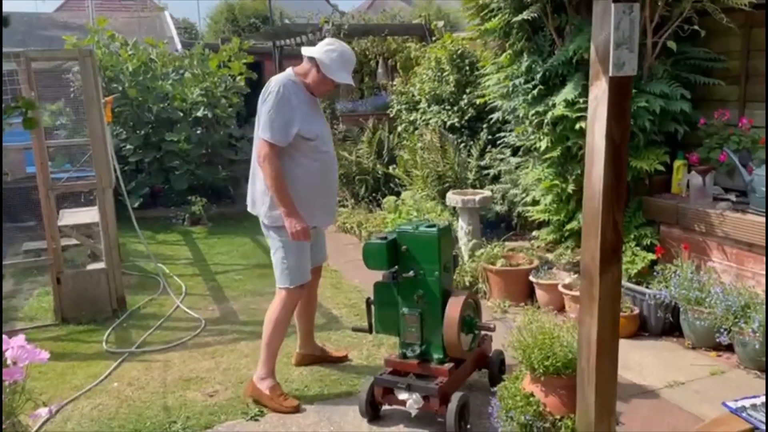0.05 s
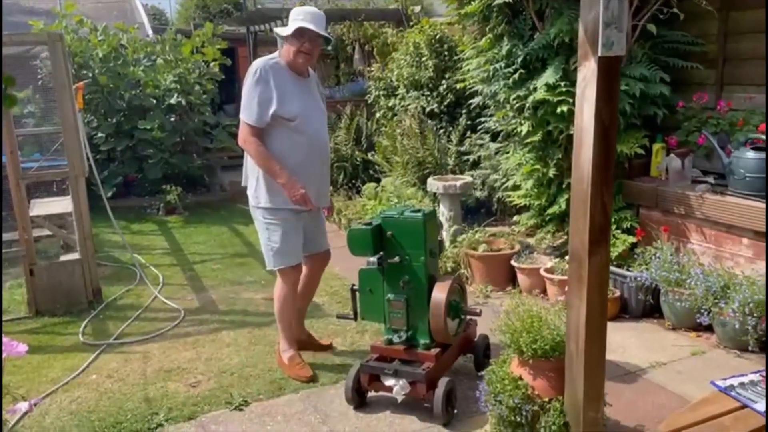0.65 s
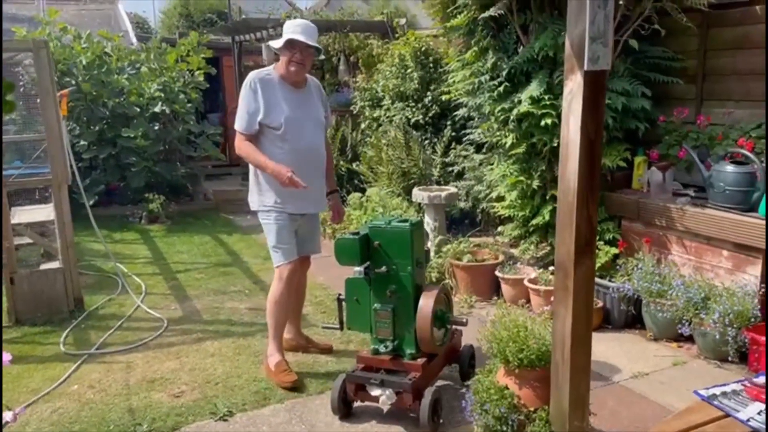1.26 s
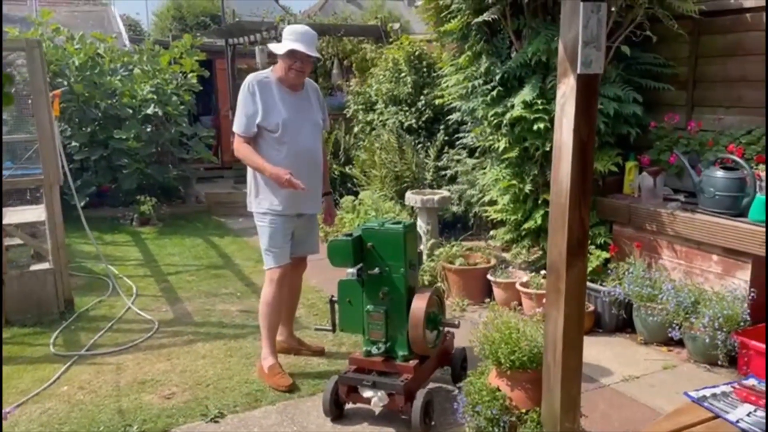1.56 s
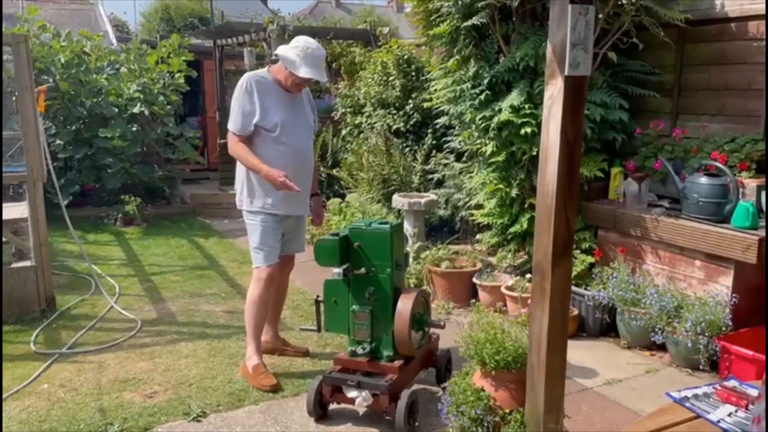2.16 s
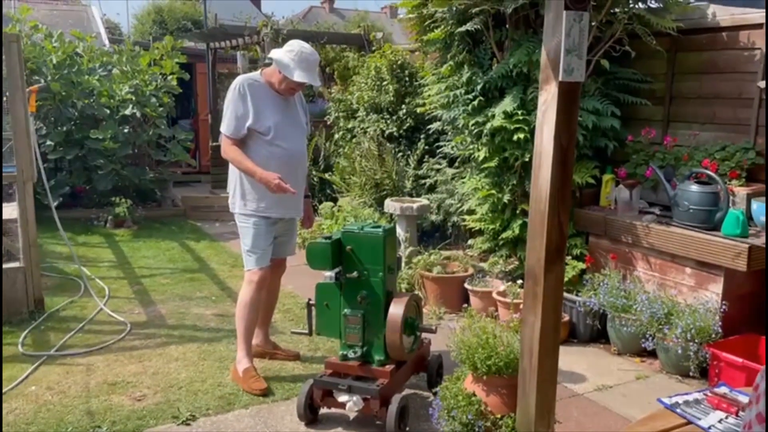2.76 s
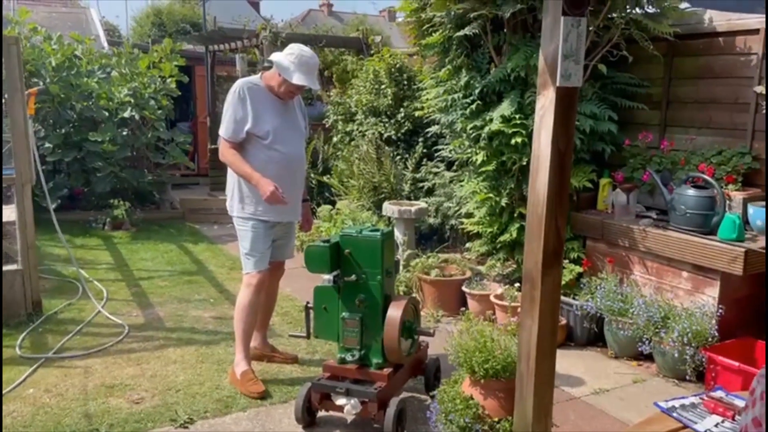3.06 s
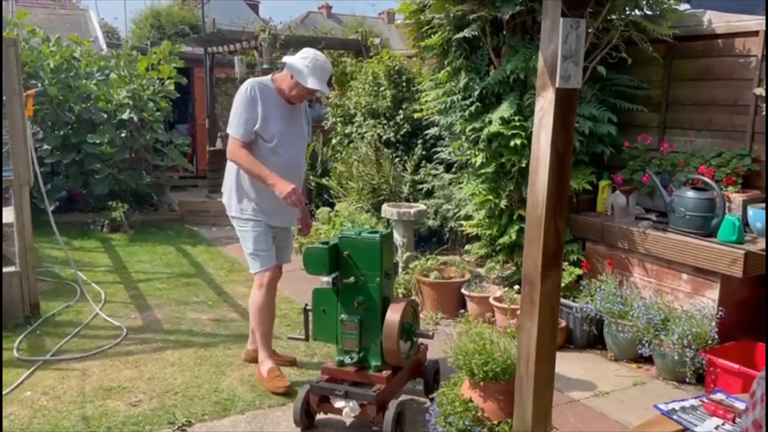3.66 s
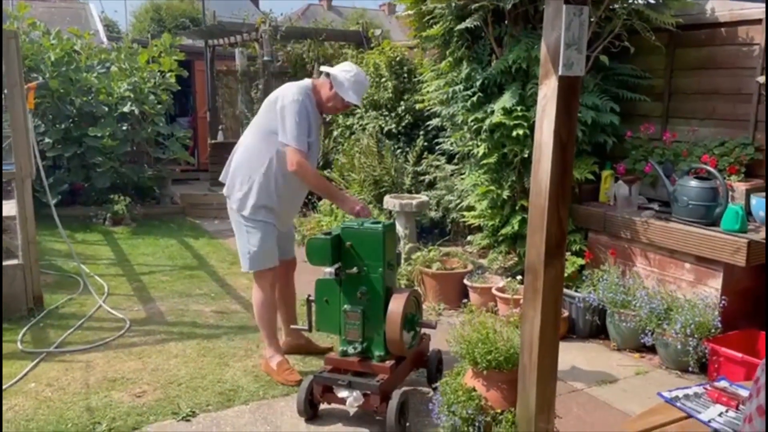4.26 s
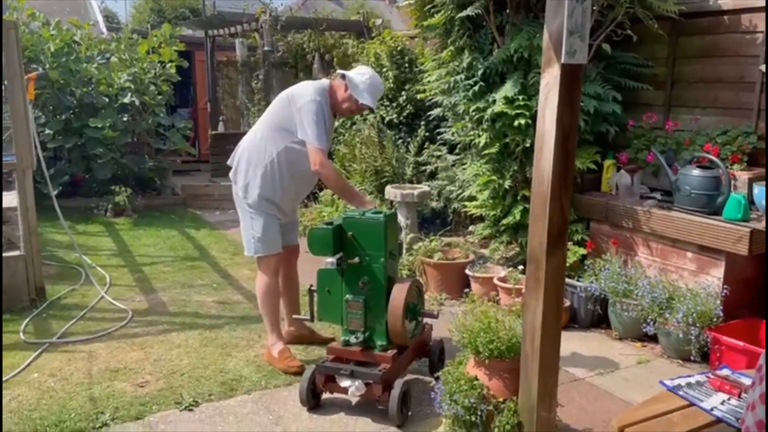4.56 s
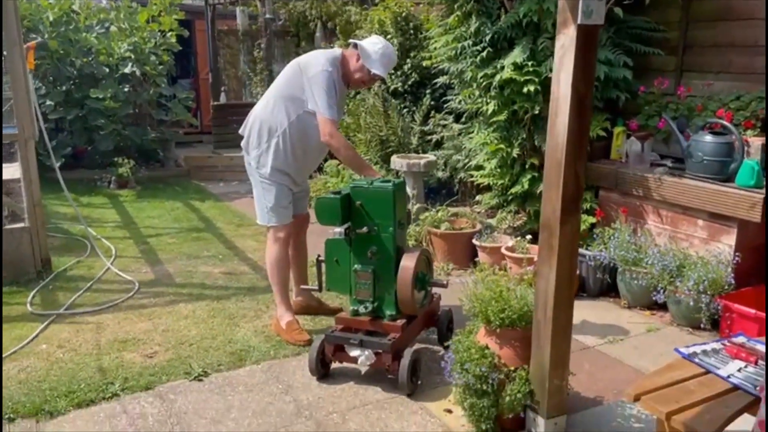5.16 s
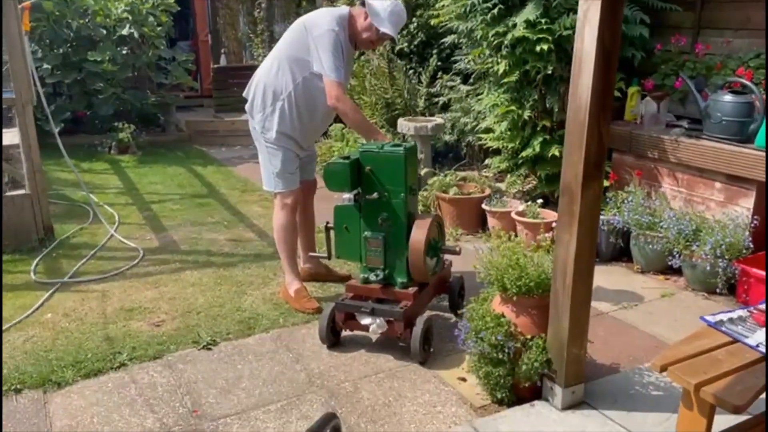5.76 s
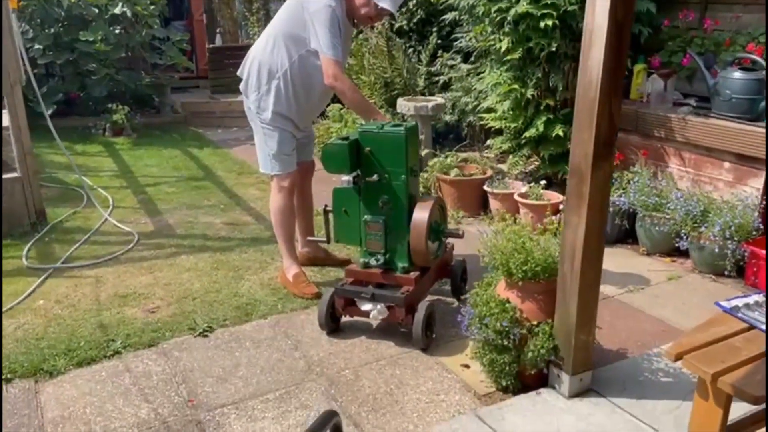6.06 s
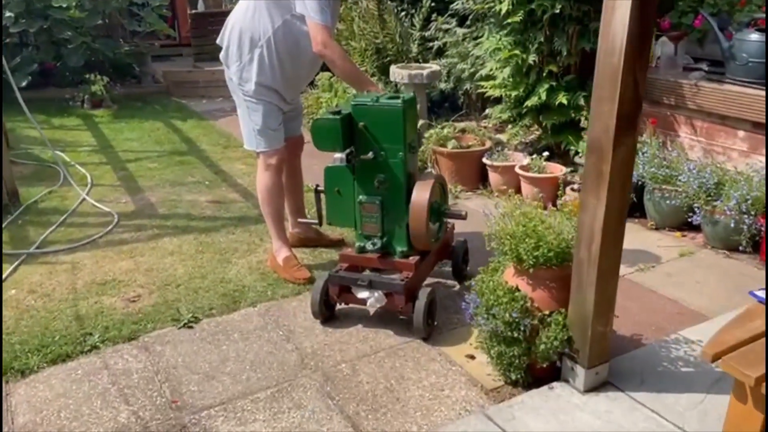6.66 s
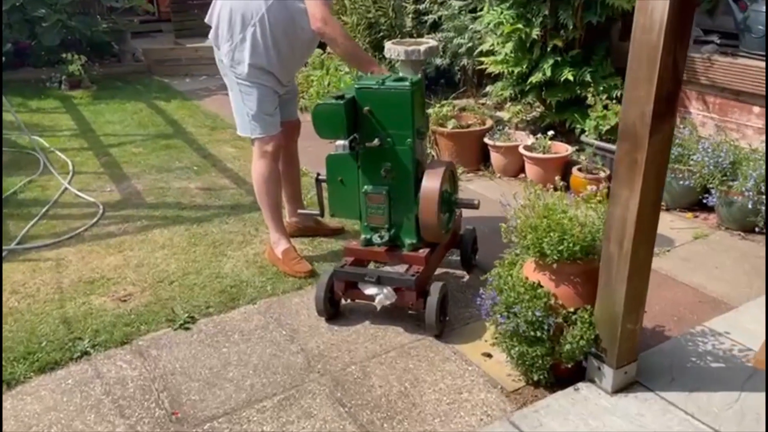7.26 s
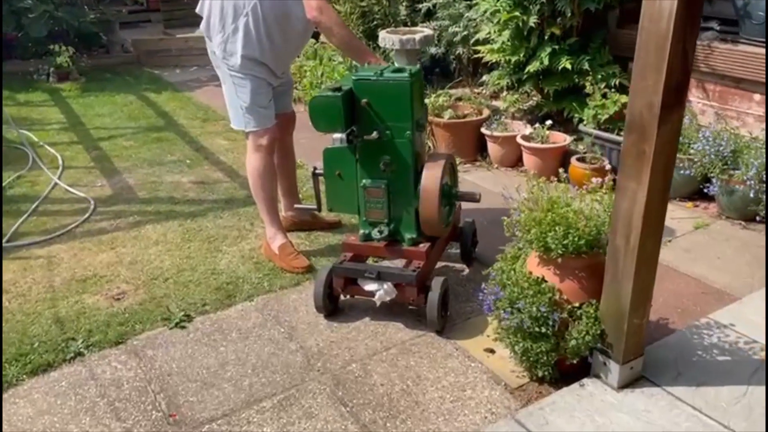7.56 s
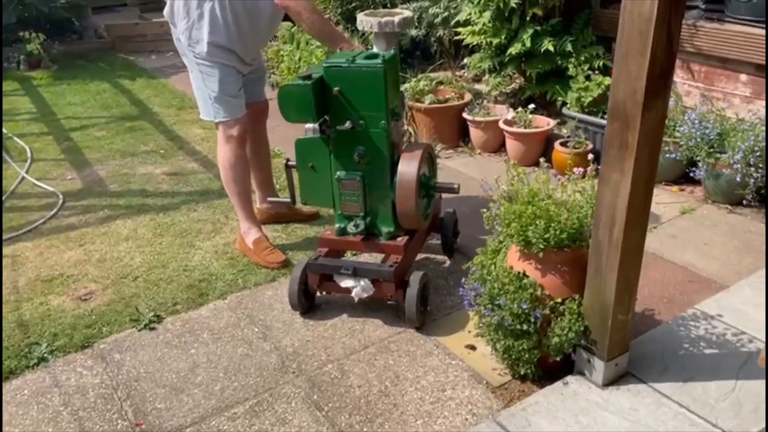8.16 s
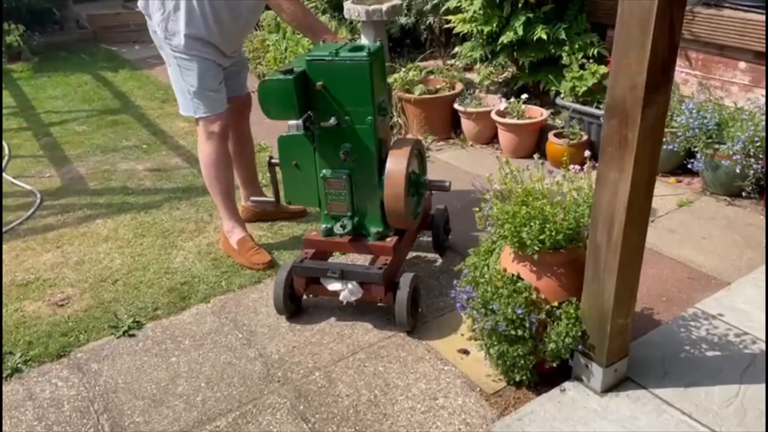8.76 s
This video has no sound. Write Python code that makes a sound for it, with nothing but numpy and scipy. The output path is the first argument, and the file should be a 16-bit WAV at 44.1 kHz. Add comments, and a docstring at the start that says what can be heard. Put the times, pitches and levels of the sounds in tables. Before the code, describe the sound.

A single-cylinder petrol engine idles in a small garden, about six beats a second. Only some beats fire, each with a bark, a deep thump and a brief whistling hiss; the rest cough softly. Valves clack and gears rattle throughout, with a slight echo from a wall. The microphone starts well back and moves closer in the last third, where the thud grows fuller.

```python
"""Stationary engine in a small garden

A single-cylinder petrol engine idles on its trolley, six cycles a second. Only some cycles fire: those
bark, hiss and thump from the exhaust; the others cough softly. Valve gear clacks and gears rattle
throughout, and a garden wall throws everything back. The microphone starts well back, then comes
slowly lower and closer."""
import sys
import numpy as np
from scipy import signal
from scipy.fft import rfft, irfft, next_fast_len
from scipy.io import wavfile
from scipy.ndimage import uniform_filter1d

SR = 44100
rng = np.random.default_rng(int(sys.argv[2]) if len(sys.argv) > 2 else 0)


def to_wav(s):
    """Save 16-bit WAV."""
    ch = np.atleast_2d(s).T  # columns
    pcm = np.round(np.clip(ch, -1, 1) * 32767)  # PCM
    wavfile.write(sys.argv[1], SR, pcm.astype(np.int16))


N = 392931
TIME = np.arange(N) / SR
EVENT_TIME = TIME[:SR // 3]

# the microphone's walk up to the engine: time_s, nearness (0 far, 1 close)
MIC_PATH = [(0, 0.28), (1.7, 0.1), (4.8, 0.093), (6.2, 0.19), (6.85, 0.72), (8.9, 0.82)]
# cycles that coast: start_s, puff_db, tick_db, clack_db, cough_db
COASTING_CYCLES = [(-0.004, 1, -1.5, 2.5, 0.5), (0.157, 1, -3, 1, -1), (0.479, 0.5, 1.5, 3.5, -0.5),
                   (0.642, 2, 4.2, -1.5, 1), (0.808, -1, 3.5, 5.5, -6), (1.133, 0.5, -1.5, 2, -1),
                   (1.459, 4.5, -2.8, 3, 0.6), (1.945, 1.3, -1.5, 1, -0.7), (2.111, -2, -0.6, -1.5, -1),
                   (2.429, 6, -2.5, 1, 0), (2.59, 1, 0, 0.5, 0.4), (2.752, 1.0, 1.5, 2.5, 0),
                   (3.073, 6.5, 2, 2.8, -3), (3.234, 3.5, -2, 0.5, -1.7), (3.887, 0.5, -0.5, 3, 0),
                   (4.053, 3.5, -2.5, 1, -2.5), (4.371, -0.5, -0.5, 3, -0.5), (4.528, 1, -1, 3, -1),
                   (4.689, 2, -1, 2, -1), (5.009, 4, -1.5, 5, 0), (5.174, 4.5, 2.5, -3, -0.5),
                   (5.495, 0, 0.5, 1, -0.5), (5.656, 2.5, -3, 0, 0.5), (5.98, -4, 1.0, 3, 0.3),
                   (6.144, -0.7, 0, 2.5, -1), (6.462, -1, 1, 2.8, -0.1), (6.621, -3, -2.5, -1, 1.5),
                   (7.106, -5, -10, 0.2, 1.5), (7.594, -5, -1.5, 0, 0.5), (7.752, -1, -4.5, 0.5, 2),
                   (8.074, -2, -2.9, -0.4, 1), (8.231, -4, -3.5, -2, 0.4), (8.556, -2.1, -1, 1.5, 0),
                   (8.876, 1, 2, 5, 1)]
# cycles that fire: start_s, charge_db, pop_db, port_ring_hz, port_ring_db,
# whistle_hz, whistle_db, second_whistle_hz, second_whistle_db
FIRING_CYCLES = [(0.322, 0.5, -6, 700, -6, 4000, 0, 4540, 0),
                 (0.968, -1.0, -1.8, 670, 5, 4440, -4, 4900.0, -9),
                 (1.296, -0.5, 1.0, 684, -4, 4480, 4.5, 5090.0, -2),
                 (1.621, -1, 1.3, 930, -8, 4480.0, -2, 4230.0, -1),
                 (1.781, -2, -5, 835, 5, 4550, -5, 5000, -14),
                 (2.275, 0, 1.5, 664, 1.5, 4650, 1.5, 4860, 3),
                 (2.916, -0.9, 0, 830, -10, 4640, 0, 4240, 0),
                 (3.399, -0.3, 2, 843, 8, 4670, -2.0, 4230.0, -4),
                 (3.561, -0.6, 0.5, 842, 6, 4220.0, -7, 4470.0, 2.5),
                 (3.726, -0.6, -1.5, 679, 6, 5120.0, 1, 4480.0, 0),
                 (4.217, -0.5, -1, 821, 8, 4360, 4, 4490, 1.5),
                 (4.852, -1.5, -1, 823, 9, 4760, -3, 4480, 0),
                 (5.337, -0.5, -3.5, 946, 6, 4240, -3, 4400, 2),
                 (5.819, -0.7, -5, 863, 7.5, 4360, 2, 3940.0, -2.0),
                 (6.308, 0.5, -6, 488, 4, 4570, 1, 4090, -5),
                 (6.78, -3.0, 2, 696, -1, 4640, -3, 4190.0, -13),
                 (6.943, -1.5, 3, 800, 0, 4410, -5, 4830, 1), (7.267, 0, 0, 823, 6, 4290, 2, 4130, -5),
                 (7.43, -1.5, -4, 834, 9.5, 4250, -6, 5120, -5.8),
                 (7.912, 0, 1, 860, -3, 4940, -1.5, 3930.0, -3),
                 (8.394, 0.3, 2, 750, -6, 4410, -2.4, 4920, -4),
                 (8.716, 0.3, 2, 960.0, 5, 4200, 2, 3910.0, -3)]

# resonances set off by a push: pitch_hz, level_db, delay_s, rise_s, t60_s
POP_MODES = [(150, -8, 0.00033, 0.0011, 0.029), (443, -1.5, 0.00048, 0.0031, 0.013),
             (604, 5.5, 0.00055, 0.0018, 0.027), (830, -6, 0.00098, 0.0014, 0.17)]  # the port as the exhaust opens
COUGH_MODES = [(55, -23.5, 0.03417, 0.0048, 0.16), (89.5, -22, 0.0215, 0.0099, 0.12),
               (131, -35.5, 0.0231, 0.0046, 0.055), (158.6, -35.5, 0.0207, 0.029, 0.54)]  # the exhaust on a coasting cycle
HEAD_MODES = [(327, -8, 0.0009, 0.0018, 0.034), (540, 2.5, 0.00042, 0.0018, 0.025),
              (1360, -8, 0.00214, 0.0008, 0.025)]  # the cylinder head as the valve seats
BOOM_MODES = [(56.7, 11.5, 0.0065, 0.027, 0.17), (109.3, 4.5, 0.02374, 0.0034, 0.11),
              (133.5, 11, 0.02659, 0.0043, 0.078), (148, -15, 0.0177, 0.026, 0.13)]  # exhaust and silencer after a firing
THUD_MODES = [(111.7, 7, 0.001, 0.012, 0.035), (89.7, 15, 0.0241, 0.016, 0.073)]  # the first surge of gas and the thud that follows
# resonances of the exhaust port: pitch_hz, width_hz, peak_db
PORT_MODES = [(236, 65, 4.5), (418, 80, -1.5), (703, 57, 0), (783, 45, 3.5), (1054, 39, 3.5)]
# resonances of the iron casting: pitch_hz, width_hz, peak_db, ring_db
CASTING_MODES = [(294, 87, 7.5, -11), (444, 9.4, 11, -11.5), (522.6, 30, 2, -8.5), (685, 48, 8.5, 0),
                 (816, 14, 7.5, 0), (990.5, 60, 9, 1), (1138, 15, -10, -5), (1348, 27, 6, -9),
                 (1660, 13, 4, -5.5), (1977, 50, 0, -9), (2335, 40, 1, -8), (2766, 37, 3.5, -17)]
# small steel parts of the rocker: pitch_hz, ring_db
ROCKER_MODES = [(2330, 2), (2900, 2), (4480, -2), (4730, 0.5), (5080, -2), (6430, -11.5)]
# ticks of cam, push rod and rocker in each cycle: delay_s, level_db, scatter_s
LINKAGE_TICKS = [(-.002, -9, 0.00042), (0.027, -10.5, 0.0028), (.036, -17, 0.0033), (.079, -9, 0.0055),
                 (0.094, -9.5, .003), (.132, -13.5, 0.0011)]

# colours of the noises: frequency_hz, level_db
PUFF_COLOUR = [(30, -33), (100, 1.5), (300, -17.5), (560, -1), (800, 0.5), (1200, -16), (2500, -23),
               (4600, -22), (7000, -62), (12000, -38)]  # air through the port
GEAR_COLOUR = [(30, -17), (100, 3), (230, -14.5), (420, 0.5), (700, -3), (1000, -5.5), (1400, -4),
               (2100, -11.5), (3400, -17), (4500, -15), (6400, -20), (7600, -53.5), (10500, -27),
               (12500, -36.5)]  # rattling teeth
CLACK_COLOUR = [(150, -23), (380, -15), (560, 15.5), (750, 11), (1000, 15.5), (1300, -9), (1800, 8.5),
                (2400, 10.5), (3400, -7.5), (4600, 4), (5600, 0), (7200, -63), (10500, -50), (12500, -63)]  # valve gear
TICK_COLOUR = [(1200, 6.5), (2000, -0.5), (2500, 3), (3400, -5), (4100, -0.5), (4600, 8), (5200, -16.5),
               (6300, -24), (7500, -57), (10000, -16), (12500, -33)]  # steel on steel
BARK_COLOUR = [(30, -14.5), (100, 5), (200, -3), (310, -3), (560, -2.5), (780, -2), (1200, -7.5),
               (2000, -19.5), (3300, -16.5), (4600, -9.5), (7000, -42), (12000, -43)]  # the charge going off
HISS_COLOUR = [(300, 0.5), (1000, -12), (2000, -6), (3400, -11), (4500, -0.5), (5400, -7.5), (6500, -6),
               (7500, -33), (8700, -34), (9700, -28), (11000, -13), (12500, -45)]  # escaping gas
SPIT_COLOUR = [(1500, -15), (4000, -4), (6000, -1), (7500, -34), (8100, -25), (8450, 4), (9000, 17.5),
               (9700, -2), (11000, 4), (12500, -27)]  # the exhaust's high spit
AIR_COLOUR = [(20, -53), (50, -8), (100, 1.5), (200, -6.5), (1000, -16), (4000, -24), (12000, -110)]  # garden air
# stereo width: frequency_hz, side_gain_db; the side is raised steeply around 7 to 9 kHz
STEREO_WIDTH = [(60, -36), (110, -9.5), (200, -8.5), (350, -8), (640, -4), (1160, -2.5), (2100, -5.5),
                (3800, -7.5), (5500, -12.5), (7000, 19), (8800, 11.5), (10000, -10.5), (12400, -10)]

# base levels at the microphone: far_db, close_db
COAST_POP_DB, PUFF_DB, COUGH_DB = (-35.5, -44), (-36.5, -34.5), (0, -4.5)
GEARS_DB, VALVE_DB, WALL_DB = (-39, -37), (-38, -36.5), (-11, -16.5)
FIRING_POP_DB, BOOM_DB, THUD_DB = (-26, -35.5), (-30.5, -32.5), (-34.5, -27.5)
BARK_DB, HISS_DB, WHISTLE_DB = (-29, -31.5), (-39, -40), (-39, -37.5)

WALL_DELAY_S = (0.054, 0.057)  # far, close
VALVE_SHUT_S = 0.045  # after the start of a cycle
BOOM_FOLLOWS, HISS_FOLLOWS = 0.26, 2  # dB per dB of charge
RING_DAMPING = 0.18  # ring time falls with this power of the frequency


def undb(db):
    """Decibels to gain."""
    return 10 ** (np.asarray(db) / 20)


def noise(size):
    """Unrelated mid and side noise."""
    return rng.standard_normal((2, size))


def at_mic(far_close, s):
    """A level or delay at time s, between its far and close values as the microphone moves."""
    nearness = np.interp(s, *np.transpose(MIC_PATH))
    return np.interp(nearness, [0, 1], far_close)


def cycles():
    """Every cycle in order, fired or not: start_s, tick_db, clack_db."""
    fired = [(s, 0, 0) for s, *_ in FIRING_CYCLES]
    coasted = [(s, tick_db, clack_db) for s, _, tick_db, clack_db, _ in COASTING_CYCLES]
    return np.transpose(sorted(fired + coasted))


def swell(rise_s, t60_s):
    """Envelope that opens smoothly and then dies away."""
    opening = np.sin(np.pi / 2 * np.minimum(EVENT_TIME / rise_s, 1)) ** 2
    return opening * np.exp(-np.log(1000) * np.maximum(EVENT_TIME - rise_s, 0) / t60_s)


def add(out, s, sound):
    """Mix a sound in at time s."""
    start = int(s * SR)
    a, b = max(start, 0), min(start + sound.shape[-1], N)
    if b > a:
        out[..., a:b] += sound[..., a - start:b - start]


def tint(x, colour, modes=()):
    """Filter by a broad colour with resonances that ring on; white noise keeps its power."""
    size = 2 * next_fast_len(N // 2 + 1, True)
    f = np.maximum(np.fft.rfftfreq(size, 1 / SR), 1)
    hz, db = np.transpose(colour)
    peaks_db = sum(peak / (1 + (2 * (f - centre) / width) ** 2) for centre, width, peak, *_ in modes)
    gain = undb(np.interp(np.log(f), np.log(hz), db) + peaks_db)
    cepstrum = irfft(np.log(gain / np.sqrt(np.mean(gain ** 2))), size)
    minimum_phase = np.exp(rfft(np.r_[cepstrum[0], 2 * cepstrum[1:size // 2]], size))
    return irfft(rfft(x, size) * minimum_phase, size)[..., :N]


def bursts(times, levels_db, envelope, colour, alike, modes=()):
    """Noise bursts: the share `alike` repeats, drifting with the microphone's place; the rest is new."""
    out = np.zeros((2, N))
    places = [noise(len(EVENT_TIME)) for _ in range(3)]
    for s, db in zip(times, levels_db):
        weights = np.cos(np.pi / 2 * np.minimum(abs(2 * s / TIME[-1] - np.arange(3)), 1))
        repeated = np.sqrt(alike) * sum(w * place for w, place in zip(weights, places))
        fresh = np.sqrt(1 - alike) * noise(len(EVENT_TIME))
        add(out, s, undb(db) * envelope * (repeated + fresh))
    return tint(out, colour, modes)


def resonate(times, levels_db, modes):
    """Each push sets a pipe or body swinging at its resonances."""
    out = np.zeros(N)
    for hz, db, delay, rise, t60 in modes:
        ring = swell(rise, t60) * np.sin(2 * np.pi * hz * EVENT_TIME)
        for s, push_db in zip(times, levels_db):
            add(out, s + delay, undb(db + push_db) * ring)
    return out


def puffs():
    """Without a firing the piston only pushes a soft, dull puff of air through the port."""
    s, puff_db = np.transpose(COASTING_CYCLES)[:2]
    envelope = swell(0.0016, 0.041) + undb(-4) * swell(0.02, 0.18)
    db = at_mic(PUFF_DB, s) + puff_db
    return bursts(s - 0.001, db, envelope, PUFF_COLOUR, alike=1, modes=PORT_MODES)


def pops():
    """The exhaust opens with a short hollow pop, harder after a firing."""
    fire_s, _, pop_db = np.transpose(FIRING_CYCLES)[:3]
    coast_s, puff_db = np.transpose(COASTING_CYCLES)[:2]
    mid = resonate(fire_s, at_mic(FIRING_POP_DB, fire_s) + pop_db, POP_MODES)
    mid += resonate(coast_s, at_mic(COAST_POP_DB, coast_s) + puff_db, POP_MODES)
    return np.array([mid, 0.8 * np.roll(mid, int(0.00015 * SR))])


def ticks(times, levels_db, envelope):
    """Dry little ticks of steel on steel."""
    force = np.zeros(N)
    for s, db in zip(times, levels_db):
        add(force, s, undb(db) * envelope)
    return tint(noise(N) * force, TICK_COLOUR)


def linkage(scatter_db=5.5):
    """Cam, push rod and rocker take up their slack at about the same points of every turn."""
    starts = cycles()[0][:, None]
    delay_s, tick_db, scatter_s = np.transpose(LINKAGE_TICKS)
    slip, force = rng.standard_normal((len(starts), 2, len(LINKAGE_TICKS))).transpose(1, 0, 2)
    s = starts + delay_s + scatter_s * slip
    db = at_mic(VALVE_DB, s) + tick_db + scatter_db * force + 2.5
    return ticks(s.ravel(), db.ravel(), swell(0.00099, 0.044))


def gears(knocks_per_s=200):
    """Timing gears and loose parts: tiny uneven knocks, loudest while the cam loads the teeth."""
    knocks = (rng.random(N) < knocks_per_s / SR) * undb(2.4 * rng.exponential(size=N))
    grain = signal.fftconvolve(np.minimum(knocks, 3), swell(0.0006, 0.027))[:N]
    rattle = tint(noise(N) * (grain + 3), GEAR_COLOUR, CASTING_MODES)
    shut_s = cycles()[0] + VALVE_SHUT_S
    turns = np.interp(TIME, shut_s, np.arange(len(shut_s)))
    # the cam turns once a cycle, the crank twice
    load_db = 1.4 * np.cos(2 * np.pi * (turns - 0.1)) + 0.98 * np.cos(4 * np.pi * (turns - 0.27))
    return rattle / rattle.std() * undb(at_mic(GEARS_DB, TIME) + load_db)


def coughs_and_thumps(mouth_hz=30):
    """Slugs of gas ring the exhaust's low resonances: a soft cough coasting, a deep thump on firing."""
    coast_s, *_, cough_db = np.transpose(COASTING_CYCLES)
    fire_s, charge_db = np.transpose(FIRING_CYCLES)[:2]
    cough = resonate(coast_s, at_mic(COUGH_DB, coast_s) + cough_db, COUGH_MODES)
    boom = resonate(fire_s, at_mic(BOOM_DB, fire_s) + BOOM_FOLLOWS * charge_db, BOOM_MODES)
    thud = resonate(fire_s, at_mic(THUD_DB, fire_s), THUD_MODES)
    # the small mouth of the pipe radiates little of the deepest bass
    mouth = signal.butter(3, mouth_hz, "high", fs=SR, output="sos")
    mid = signal.sosfiltfilt(mouth, cough + boom + thud)
    # a slightly later copy as the side signal pulls the sound to the left
    return np.array([mid, 0.77 * np.roll(mid, int(0.001 * SR))])


def metal_ring(times, levels_db, modes, t60_s, spread):
    """Metal rings after a blow; the high modes, of loose parts, die sooner and shift more each time."""
    out = np.zeros((2, N))
    hz, *_, ring_db = np.transpose(modes)
    envelopes = np.array([swell(0.00051, t60_s * (hz.min() / f) ** RING_DAMPING) for f in hz])
    for s, db in zip(times, levels_db):
        shifted_hz = hz * (1 + spread * np.sqrt(hz / hz.max()) * rng.standard_normal(len(hz)))
        tones = np.sin(2 * np.pi * (shifted_hz[:, None] * EVENT_TIME + rng.random((len(hz), 1))))
        strengths = noise(len(hz)) * undb(db + ring_db)
        add(out, s, strengths @ (tones * envelopes))
    return out


def valve():
    """The follower scrapes down the cam, the valve ticks onto its seat, the head knocks, iron rings."""
    start_s, tick_db, clack_db = cycles()
    s = start_s + VALVE_SHUT_S
    db = at_mic(VALVE_DB, start_s)
    seat_db, head_db = db + tick_db, db + clack_db
    scrape = bursts(s - 0.014, db + 4, swell(0.01, 0.021), CLACK_COLOUR, alike=0.55, modes=CASTING_MODES)
    tick = ticks(s, seat_db + 8, swell(0.0008, 0.022))
    rocker = metal_ring(s, seat_db - 4, ROCKER_MODES, t60_s=0.04, spread=0.02)
    knock = resonate(s, head_db, HEAD_MODES) * np.array([[1], [0.6]])
    envelope = undb(-1.5) * swell(0.003, 0.04) + undb(-4.5) * swell(0.027, 0.15)
    clack = bursts(s, head_db + 0.3, envelope, CLACK_COLOUR, alike=0.4, modes=CASTING_MODES)
    casting = metal_ring(s + 0.00203, head_db - 2.5, CASTING_MODES, t60_s=0.28, spread=0.0207)
    return scrape + tick + rocker + knock + clack + casting


def wall_echo(engine, shrubs_hz=2500):
    """The garden wall throws the engine back; shrubs in front of it soak up the treble."""
    dull = signal.lfilter(*signal.butter(1, shrubs_hz, fs=SR), engine)
    lag_s = at_mic(WALL_DELAY_S, TIME)
    echo = np.array([np.interp(TIME - lag_s, TIME, channel, left=0) for channel in dull])
    return undb(at_mic(WALL_DB, TIME)) * echo


def gas_tone(hz, waver, sag_per_s):
    """A wavering tone of the escaping gas that sags as the pressure drops."""
    wander = uniform_filter1d(noise(len(EVENT_TIME)), size=160)
    pitch_hz = hz * (1 + waver * wander / wander.std() - sag_per_s * EVENT_TIME)
    return np.sqrt(2) * np.sin(2 * np.pi * np.cumsum(pitch_hz, axis=1) / SR)


def barks():
    """The charge goes off with a bark that rings the casting and the port."""
    s, charge_db, _, ring_hz, ring_db = np.transpose(FIRING_CYCLES)[:5]
    bark_db = at_mic(BARK_DB, s) + charge_db
    envelope = undb(1) * swell(0.00093, 0.038) + undb(-1) * swell(0.02, 0.24)
    out = bursts(s - 0.001, bark_db + 0.3, envelope, BARK_COLOUR, alike=0.57, modes=PORT_MODES)
    out += metal_ring(s, bark_db - 10.5, CASTING_MODES, t60_s=0.35, spread=0.0303)
    for at, db, hz in zip(s, bark_db + ring_db - 11.5, ring_hz):
        add(out, at, undb(db) * swell(0.014, 0.19) * gas_tone(hz, waver=0.019, sag_per_s=0.1))
    return out


def hiss():
    """After a firing, gas hisses and spits out of the exhaust."""
    s, charge_db = np.transpose(FIRING_CYCLES)[:2]
    db = at_mic(HISS_DB, s) + HISS_FOLLOWS * charge_db
    envelope = swell(0.022, 0.23) + undb(1) * swell(0.0042, 0.2)
    jet = bursts(s - 0.002, db - 1.7, envelope, HISS_COLOUR, alike=0.11)
    spit = bursts(s + 0.011, db - 5, swell(0.0025, 0.17), SPIT_COLOUR, alike=0.17)
    return jet + spit


def whistles():
    """The jet of gas whistles: a main tone, a neighbour and a rough octave."""
    out = np.zeros((2, N))
    for s, *_, main_hz, main_db, second_hz, second_db in FIRING_CYCLES:
        tones = [(main_hz, main_db, 0.004), (second_hz, second_db, 0.005),
                 (1.98 * main_hz, main_db - 15, 0.012)]
        for hz, db, waver in tones:
            envelope = undb(at_mic(WHISTLE_DB, s) + db) * swell(0.015, 0.16)
            add(out, s, envelope * gas_tone(hz, waver, sag_per_s=0.049))
    return out


def sputter(depth_db, rate_hz):
    """Quick uneven gusts in a jet of gas; mean power 1."""
    gusts = rng.standard_normal(N // 50)
    gain = undb(depth_db * np.interp(TIME * rate_hz, np.arange(len(gusts)), gusts))
    return gain / np.sqrt(np.mean(gain ** 2))


def stray_tick(start_s=2.884, level_db=-33):
    """A loose steel part clicks once, out of step with the beat."""
    return ticks([start_s], [level_db], swell(0.00059, 0.047))


def scene():
    """The engine, its echo from the wall and the garden air, spread to left and right."""
    firings = barks() + (hiss() + whistles()) * sputter(depth_db=2.5, rate_hz=320)
    exhaust = firings + puffs() + pops() + coughs_and_thumps()
    engine = exhaust + valve() + linkage() + stray_tick() + gears()
    air = undb(-44) * tint(noise(N), AIR_COLOUR)
    mid, side = engine + wall_echo(engine) + air
    size = next_fast_len(N, True)
    side_db = np.interp(np.fft.rfftfreq(size, 1 / SR), *np.transpose(STEREO_WIDTH))
    side = irfft(rfft(side, size) * undb(side_db), size)[:N]
    left_db = 0.3
    return np.array([(mid + side) * undb(left_db), (mid - side) * undb(-left_db)])


def record(dry):
    """The microphone sheds the deepest bass and the top."""
    bottom_hz, top_hz = 22, 12600
    x = signal.sosfilt(signal.butter(2, bottom_hz, "high", fs=SR, output="sos"), dry)
    return signal.sosfilt(signal.ellip(10, 0.2, 80, top_hz, fs=SR, output="sos"), x)


dry = scene()
out = record(dry)
to_wav(out)
```